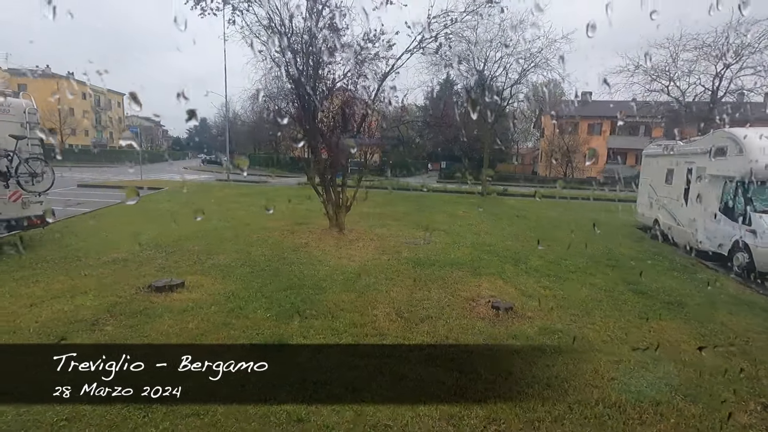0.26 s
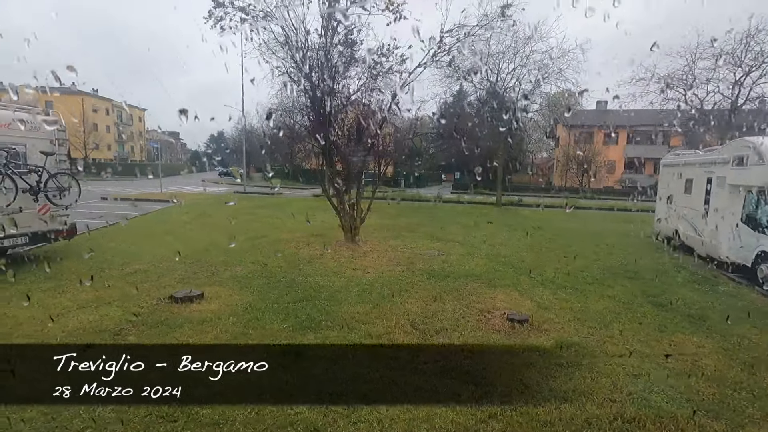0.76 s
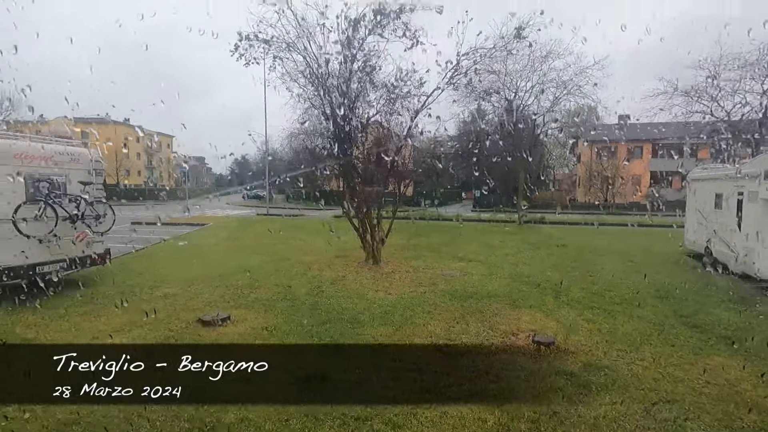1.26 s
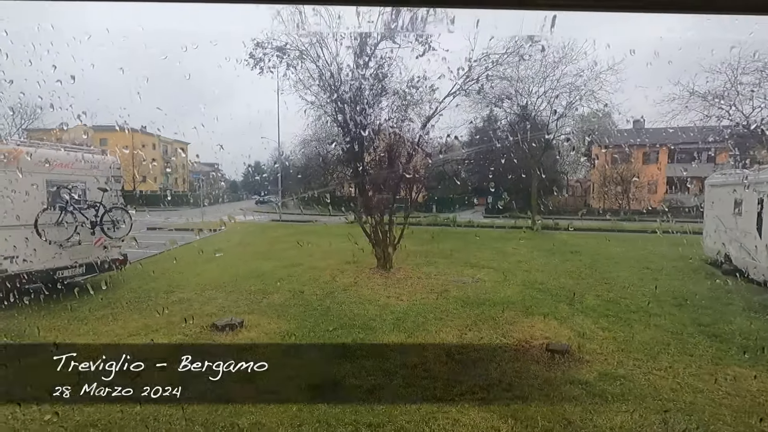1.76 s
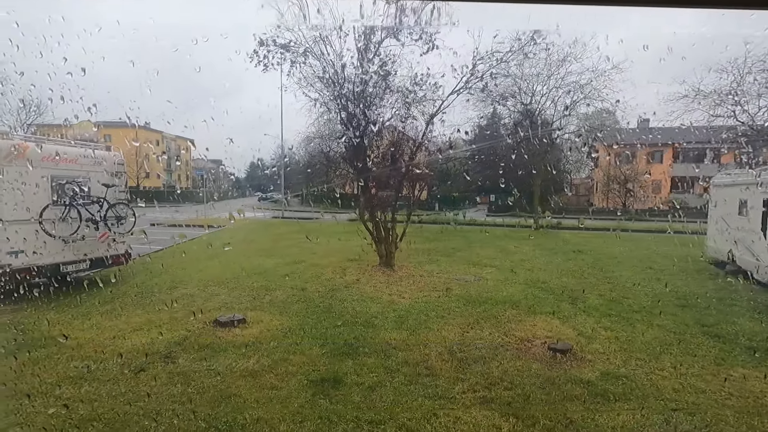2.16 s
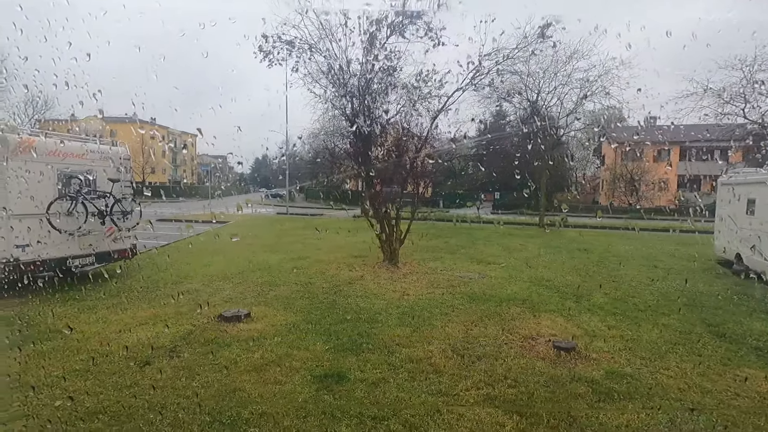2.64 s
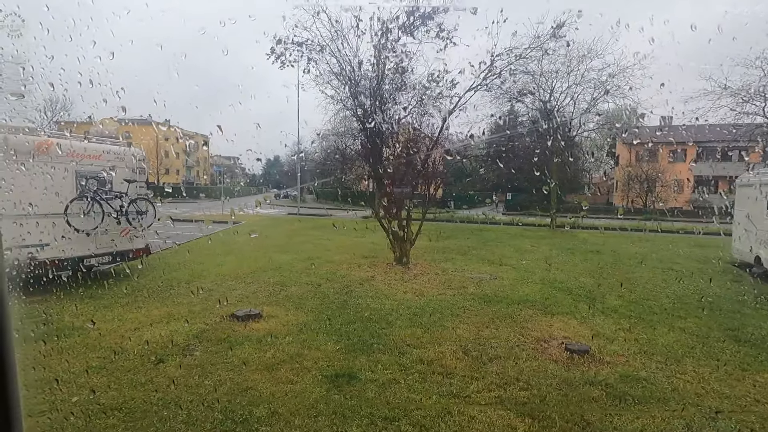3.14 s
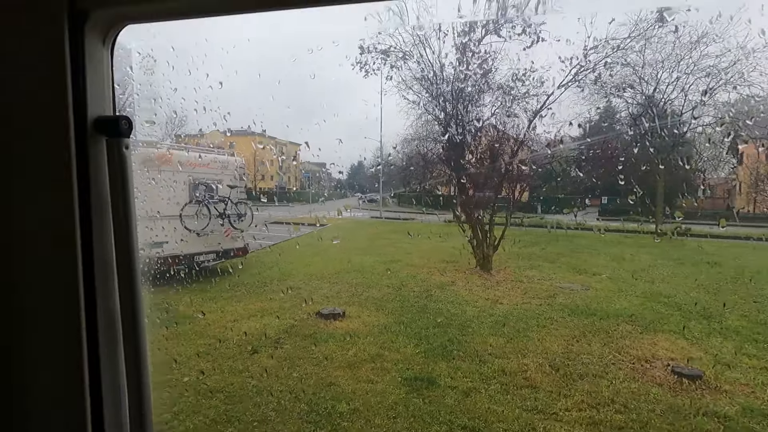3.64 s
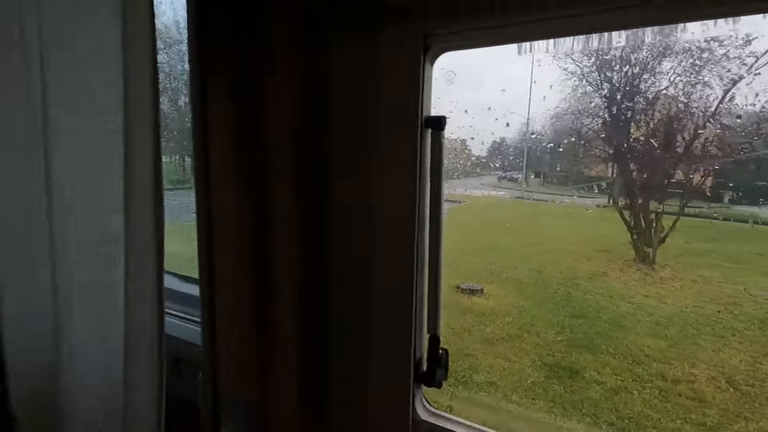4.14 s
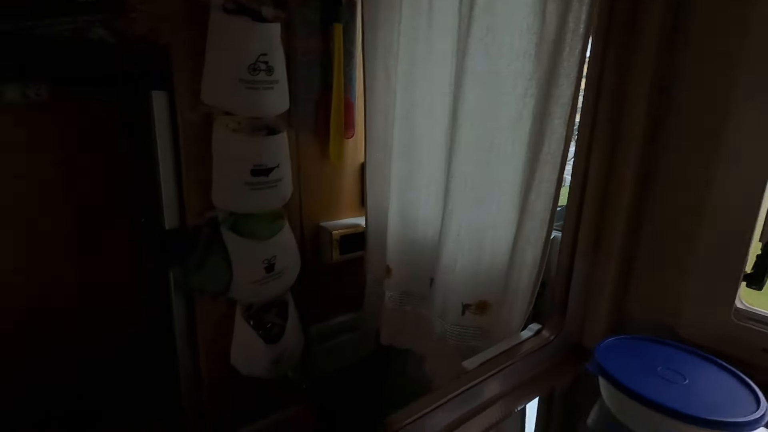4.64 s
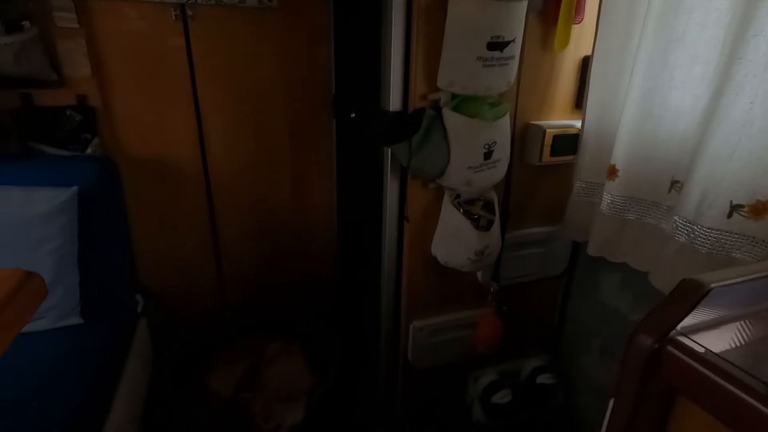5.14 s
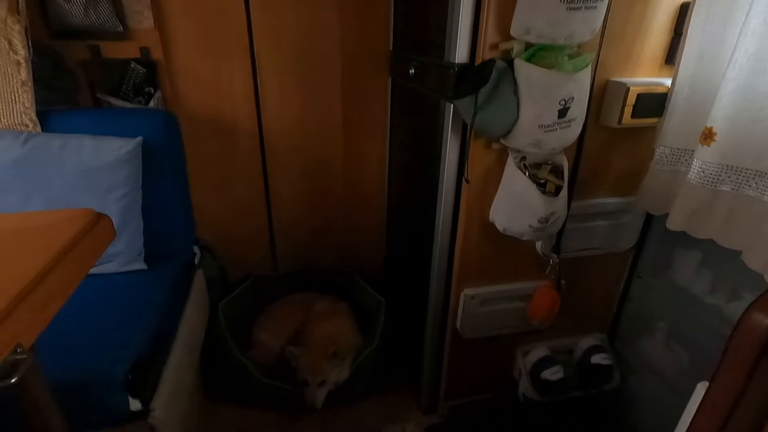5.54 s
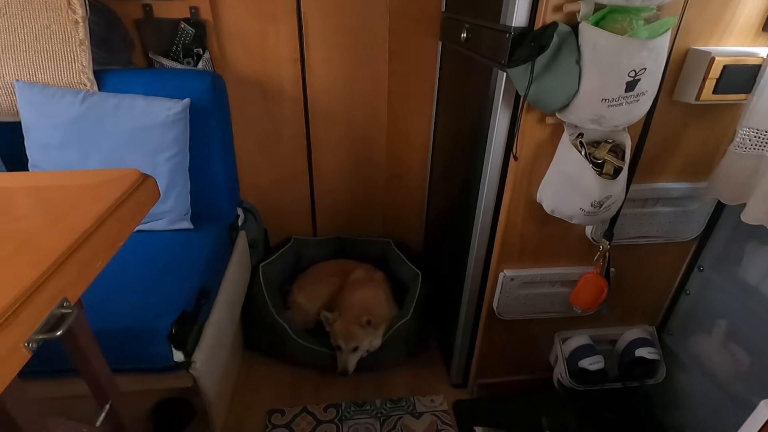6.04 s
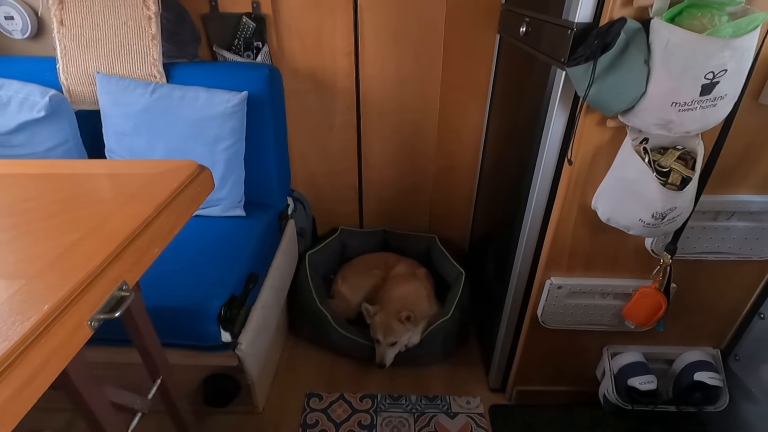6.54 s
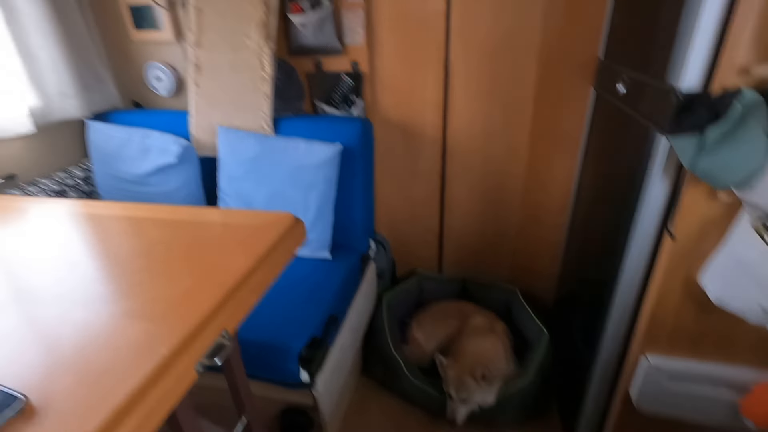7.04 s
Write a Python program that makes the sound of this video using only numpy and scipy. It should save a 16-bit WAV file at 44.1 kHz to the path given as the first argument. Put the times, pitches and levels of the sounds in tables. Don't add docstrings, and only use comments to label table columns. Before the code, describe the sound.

Steady soft rain on a parked van, heard from inside; midway come fabric swishes, a metal clack, thumps, then three growing close knocks.

```python
import sys
import numpy as np
from scipy import signal
from scipy.fft import rfft, irfft
from scipy.io import wavfile
from scipy.ndimage import uniform_filter1d

SR = 44100
rng = np.random.default_rng(int(sys.argv[2]) if len(sys.argv) > 2 else 0)


def field_ratio(decibels):
    return 10 ** (np.asarray(decibels, dtype=float) / 20)


def transcribe(u):
    v = np.clip(np.atleast_2d(u).T, -1, 1)
    q = np.round(v * 32767).astype(np.int16)
    wavfile.write(sys.argv[1], SR, q)


N = 321656
T = np.arange(N) / SR
HZ = np.arange(N // 2 + 1) * SR / N + 1e-3
BURST_T = np.arange(int(.4 * SR)) / SR

# time_s, level_db
RAIN_SWELL = [(0, -0.5), (.47, -1), (.75, -1), (1.4, -1.5), (2.17, 1.5), (2.56, 0), (2.86, 0), (3.3, 0.5),
              (3.88, 2), (4.2, -1.5), (4.81, 4), (5.1, 1), (5.56, 4.5), (5.91, -1.5), (6.29, 6), (6.65, 1),
              (6.9, 1), (7.29, 3.5)]
# time_s, turn
CAMERA_TURN = [(0, 0), (3.9, .1), (4.6, .7), (5.1, 1), (7.29, 1)]
# pitch_hz, width_hz, window_lift_db, cabin_lift_db
ROOF_PANELS = [(198, 14, 2, 4), (385, 20, 5, 3), (440, 16, 4, 2), (578, 24, 4, 0), (1430, 90, 2, 0),
               (3400, 500, 1, 3)]
# pitch_hz, level_db_per_hz
ROOF_WINDOW = [(36, -30.5), (62, -9.5), (70, -7.5), (131, -2), (260, -24), (372, -19.5), (446, -21.5),
               (468, -28), (574, -23.5), (804, -43.5), (1100, -54), (1430, -69), (2420, -120)]
# pitch_hz, level_db_per_hz
ROOF_CABIN = [(41, -34.5), (70, 10.5), (76, -18.5), (108, -22), (150, -8.5), (198, -3), (437, -15),
              (474, -17.5), (538, -16), (806, -35), (1100, -27.5), (1430, -55), (2420, -120)]
# pitch_hz, level_db_per_hz
PATTER_WINDOW = [(440, -36), (750, 6.5), (935, -8.5), (1100, -1.5), (1240, -3), (1420, -1.5), (1750, -7),
                 (2130, -8.5), (3430, -8.5), (4270, -25.5), (7630, -31), (12000, -60), (15600, -59),
                 (22000, -120)]
# pitch_hz, level_db_per_hz
PATTER_CABIN = [(440, -35), (750, -5), (804, -12), (1070, 3.5), (1830, -4), (3230, -12), (3390, -19),
                (7540, -29), (12000, -59), (15600, -59), (22000, -120)]
# window_db, cabin_db, share of the swell followed
RAIN_LAYERS = [
    (-49.5, -54, 1),
    (-62, -56, .7),
    (-69.5, -66.5, 0.83),
    (-86.5, -84, .1),
]
# pitch_hz, side_minus_mid_db
STEREO_WIDTH = [(60, -30.5), (110, -26), (200, -13.5), (380, -17.5), (700, -8), (1290, -8.5), (2380, -7),
                (4400, -8), (8120, -7), (15000, 27)]
# pitch_hz, left_minus_right_db
STEREO_LEAN = [(60, 6), (110, -0.5), (200, 0.0), (380, 2), (700, 0.5), (1290, 2), (2380, 2), (4400, 1.0),
               (8120, 4), (15000, 20.5)]
# start_s, peak_db, low_part_db, ring_s
PANE_DROPS = [(0.0054, -55.5, -8, 0.077), (0.0938, -60, -8, 0.24), (0.2734, -62, -13, 0.16),
              (0.591, -69, -30, 0.097), (0.882, -54.5, -6, 0.28), (0.997, -63, -11, 0.09),
              (1.1883, -67, -4, 0.075), (1.2335, -63, 9, 0.47), (1.284, -64, -7, 0.09),
              (1.499, -53, -29, 0.13), (1.751, -61.5, -11, 0.25), (1.8346, -56.5, 6, 0.12),
              (1.945, -72, -5, 0.09), (2.257, -65, -12, 0.15), (2.9723, -63, 7, 0.23),
              (3.0553, -67, -5, 0.083), (3.441, -77, -9, 0.13)]
# start_s, peak_db, pitch_hz, low_part_db, ring_s
CABIN_TAPS = [(3.1558, -52.5, 2820, -19, 0.13), (3.703, -53, 3500, 4, 0.03),
              (3.7675, -36, 2500, -10, 0.072), (4.3036, -57, 2600, 4, 0.14), (4.933, -59, 2680, 9, 0.11),
              (5.116, -43.5, 2500, -1.5, 0.2), (5.176, -47, 2300, 5, 0.078), (5.227, -48, 3140, 1, 0.13),
              (5.6226, -52.5, 2130, 12, 0.16), (6.311, -58, 2610, 7, 0.11), (6.6872, -63, 2443, 11.5, 0.1),
              (6.86, -51.5, 4140, -18, 0.16)]
# start_s, left_peak_db, right_peak_db
HANDLE_KNOCKS = [
    (5.4244, -27.5, -20),
    (5.80274, -17, -10),
    (6.12444, -15.3, -8.2),
]
KNOCK_TICK_DB = (-40.5, -33, -34)
# thud_hz, bend_hz, thud_lag_s, crack_hz, crack_edge_hz, crack_db
HANDLE_PATHS = [
    (138, 440, .00027, 1130, 1300, -29.5),
    (165, 305, .00007, 255, 900, -15.5),
]
# start_s, peak_db, rattle_s
LATCH_BOUNCES = [
    (4.7685, -40, .004),
    (4.774, -22, .005),
    (4.783, -26.5, .011),
    (4.797, -32.5, .005),
    (4.808, -39, .012),
    (4.826, -46, .012),
]
# pitch_hz, level_db, t60_s
LATCH_MODES = [(340, -12, .05), (640, -2, .045), (735, -2, .04), (900, -3, .02), (1179, 0, .04),
               (1550, 3, .012), (2050, 3, .018), (2400, -3, .015), (2750, -3, .012), (3305, -3, .014),
               (3800, -3, .018), (4300, -8, .012), (4900, -13, .012), (6778, -11, .008)]
# start_s, peak_db, pitch_hz, t60_s
FLOOR_THUMPS = [(3.769, -43.5, 350, 0.081), (3.869, -39.5, 84, 0.23), (3.951, -43.5, 116.5, .3),
                (4.302, -34.5, 99, 0.22), (4.341, -32, 108, 0.07), (5.118, -30, 202, 0.033),
                (5.1787, -23.5, 159.4, 0.093), (5.186, -27, 89.5, 0.06), (5.23, -34.5, 69, 0.15),
                (7.129, -38, 328, 0.049)]
# start_s, peak_db, hold_s, t60_s, pitch_hz
CLOTH_SWISHES = [(3.684, -68.5, 0.025, .02, 6830), (3.698, -61.5, .074, .02, 6500),
                 (3.839, -71, 0.008, 0.052, 8950), (4.297, -58, 0.012, 0.31, 4130),
                 (4.325, -60, 0.022, 0.12, 2080), (4.632, -68, 0.027, 0.19, 4760),
                 (5.117, -54, 0.04, .12, 3850), (5.168, -51, .0047, 0.081, 1960),
                 (5.614, -56.5, 0.019, .06, 4440), (6.853, -58, 0.018, 0.08, 3060),
                 (7.064, -88, .04, .15, 5000), (7.23, -78, .05, .1, 5000)]
# start_s, pitch_hz, width_hz, level_db, hold_s
CLOTH_SQUEAKS = [
    (3.277, 4750, 500, -77, 0.019),
    (3.695, 4900, 160, -61.5, 0.024),
    (3.7, 8900, 30, -69, 0.058),
]
# peak_s, peak_db, swell_s, fade_s
ARM_STROKES = [(.87, -86, 0.42, 0.47), (3.25, -102, .4, .4), (3.62, -91.5, 0.43, 0.64),
               (3.79, -80, 0.23, .1), (3.94, -78, 0.11, 0.19), (4.63, -82.5, 1, 0.33),
               (4.755, -68.5, 0.087, 0.068), (4.95, -80.5, 0.41, 0.5), (5.2, -87, 0.18, 0.18),
               (5.33, -87, .1, 0.36), (5.5, -77, .25, 1), (5.62, -87, 0.44, 0.52), (5.73, -91, .3, .07),
               (5.97, -94, 0.1, 0.064), (6.086, -88, 0.046, 0.021), (6.19, -84.5, .05, 0.17),
               (6.664, -86, .05, 0.072), (6.9, -83.5, 0.13, 0.12), (7.104, -85, .06, .2),
               (7.29, -83, 0.16, .1)]
# pitch_hz, level_db_per_hz
CLOTH_COLOUR = [(880, -32), (1500, -2), (1670, -6), (1910, 0), (2570, -8), (2750, -8), (7210, -18),
                (12200, -29), (15400, -47)]
# peak_s, peak_db
HAND_LURCHES = [(.13, -68), (.6, -61), (2.54, -54), (3.42, -44.5), (3.96, -54), (4.5, -43), (5.62, -39),
                (5.97, -42), (6.498, -55), (6.998, -47)]
# time_s, low_hum_db, high_hum_db
HUM_LEVELS = [(0, -47, -46), (.7, -44, -56.5), (1.3, -46, -44.5), (2, -46.5, -48), (2.8, -44.5, -45.5),
              (3.3, -52.5, -47.5), (3.8, -48.5, -48), (4.2, -40, -41), (4.8, -49, -42), (5.3, -39, -43),
              (5.7, -44.5, -44.5), (6.3, -44.5, -43.5), (6.8, -43, -46), (7.29, -43.5, -44.5)]
HUM_PITCHES = (33.9, 49.1)


def unit(x):
    return x / np.sqrt(np.mean(x ** 2, axis=-1, keepdims=True))


def curve(table):
    s, *columns = np.transpose(table)
    return [np.interp(T, s, c) for c in columns]


def colour(points):
    hz, db = np.transpose(points)
    return np.interp(np.log(HZ), np.log(hz), db)


def band(x, hz, width, order=1):
    edges = np.clip([hz - width / 2, hz + width / 2], 10, .45 * SR)
    return signal.sosfilt(signal.butter(order, edges, "band", fs=SR, output="sos"), x)


def walk(rate):
    k = int(SR / rate)
    steps = np.repeat(rng.standard_normal(N // k + 1), k)
    return 2.75 * uniform_filter1d(steps, k)[:N]


def add(out, s, x):
    i = int(s * SR)
    out[:, i:i + x.shape[-1]] += x[..., :N - i]


def wide(length, side_db, lean_db):
    mid, side = rng.standard_normal((2, length))
    side = field_ratio(side_db) * side
    return np.array([(mid + side) * field_ratio(lean_db / 2), (mid - side) * field_ratio(-lean_db / 2)])


def envelope(rise, hold, t60):
    fall = field_ratio(-60 * np.clip(BURST_T - rise - hold, 0, None) / t60)
    return np.clip(BURST_T / max(rise, 1e-4), 0, 1) ** 2 * fall


def swells(rows, rest_db):
    power = field_ratio(2 * rest_db)
    for s, db, swell, fade in rows:
        distance = np.where(T < s, (s - T) / swell, (T - s) / fade)
        power = power + field_ratio(2 * db - 40 * distance)
    return np.sqrt(power)


def patter(rate=700, scatter_db=2.5, t60=0.12):
    hits = (rng.random(N) < rate / SR) * field_ratio(2 * scatter_db * rng.exponential(size=N))
    tail = field_ratio(-60 * np.arange(SR // 4) / SR / t60) ** 2
    floor = 0.13 * hits.mean() * tail.sum()
    return np.sqrt(signal.fftconvolve(hits, tail)[:N].clip(0) + floor)


def rain():
    (turn,), (swell_db,) = curve(CAMERA_TURN), curve(RAIN_SWELL)
    mid, side = rfft(rng.standard_normal((2, N)) * patter())
    side = side * field_ratio(colour(STEREO_WIDTH))
    pair = np.array([mid + side, mid - side]) * field_ratio(np.outer([.5, -.5], colour(STEREO_LEAN)))
    lifts = [0, 0]
    for hz, width, *lift_db in ROOF_PANELS:
        peak = 1 / (1 + (2 * (HZ - hz) / width) ** 2)
        lifts = [lift + db * peak for lift, db in zip(lifts, lift_db)]
    roof = [field_ratio(colour(p) + lift) for p, lift in zip((ROOF_WINDOW, ROOF_CABIN), lifts)]
    drops = [field_ratio(colour(p) + lift) for p, lift in zip((PATTER_WINDOW, PATTER_CABIN), lifts)]
    edges = (64, 220, 900, 4200, 14000)
    out = 0
    for layer, lo, hi, gains in zip(RAIN_LAYERS, edges, edges[1:], (roof, roof, drops, drops)):
        window_db, cabin_db, share = layer
        group = [0, 0]
        for hz in lo * 2 ** np.arange(1 / 6, np.log2(hi / lo), 1 / 3):
            mask = np.cos(np.pi / 2 * np.clip(3 * np.log2(HZ / hz), -1, 1))
            flicker = field_ratio(.7 * walk(14))
            group = [g + flicker * irfft(pair * mask * gain, N) for g, gain in zip(group, gains)]
        near, far = (g / g.std() for g in group)
        places = (1 - turn) * field_ratio(window_db) * near + turn * field_ratio(cabin_db) * far
        out = out + field_ratio(share * swell_db) * places
    return out


def tap(out, s, db, hz, low_db, t60, core_db, high_db):
    noise = wide(len(BURST_T), -7, 1.5)
    ring = field_ratio(core_db) * unit(band(noise, hz, 600, order=2))
    ring = ring + unit(band(noise, 2700, 2400, order=2))
    ring = ring + field_ratio(low_db) * unit(band(noise, 1400, 1000, order=2))
    ring = ring + field_ratio(high_db) * unit(band(noise, 5200, 2400, order=2))
    onset = envelope(.003, .004, t60)
    add(out, max(s - .003, 0), field_ratio(db - 10) * onset * band(ring, 3500, 5600, order=3))


def heavy_drops(out):
    for s, db, low_db, t60 in PANE_DROPS:
        tap(out, s, db, 3260, low_db, t60, core_db=-1, high_db=-19)
    return out


def cabin_taps(out):
    for row in CABIN_TAPS:
        tap(out, *row, core_db=-9.5, high_db=-20)
    return out


def knocks(out):
    crack_damping, low_cut_hz = .65, 25
    jw = 1j * np.fft.rfftfreq(8192, 1 / SR)
    low_cut = jw ** 2 / (jw ** 2 + 2 ** .5 * low_cut_hz * jw + low_cut_hz ** 2)
    for ear, (thud_hz, bend_hz, lag, crack_hz, edge_hz, crack_db) in enumerate(HANDLE_PATHS):
        bend = ((jw - bend_hz) / (jw + bend_hz)) ** 2 * np.exp(-2 * np.pi * jw * lag)
        thud = bend * low_cut / (1 + jw / thud_hz) ** 2
        u = jw / crack_hz
        crack = field_ratio(crack_db) * u / (1 + crack_damping * u + u ** 2) / (1 + jw / edge_hz)
        blow = -irfft((thud + crack) / (1 + jw / 9000) ** 2)[None]
        for s, *peak_db in HANDLE_KNOCKS:
            add(out[ear:ear + 1], s, field_ratio(peak_db[ear]) * blow / abs(blow).max())
    tick = -band(signal.unit_impulse(256), 6800, 4600, order=2)
    for (s, *_), db in zip(HANDLE_KNOCKS, KNOCK_TICK_DB):
        add(out, s, field_ratio(db) * tick[None] / abs(tick).max())
    return out


def latch(out):
    body = sum(field_ratio(g - 60 * BURST_T / t60) * np.sin(2 * np.pi * hz * BURST_T) for hz, g, t60 in LATCH_MODES)
    for s, db, rattle in LATCH_BOUNCES:
        shake = wide(len(BURST_T), -8, 2) * envelope(.0015, rattle, .03)
        ring = signal.fftconvolve(shake, body[None], axes=1)[:, :len(BURST_T)]
        ring = band(ring, 3900, 7300, order=2)
        grit = band(shake, 1970, 2920, order=2)
        add(out, s, field_ratio(db) * (ring / abs(ring).max() + field_ratio(-11) * grit / abs(grit).max()))
    return out


def floor_thumps(out):
    for s, db, hz, t60 in FLOOR_THUMPS:
        tone = np.sin(2 * np.pi * hz * BURST_T) * np.ones((2, 1))
        add(out, s, field_ratio(db) * envelope(.002, 0, t60) * tone)
    return out


def cloth_swishes(out):
    for s, db, hold, t60, hz in CLOTH_SWISHES:
        noise = band(wide(len(BURST_T), -7, 1.5), 7000, 13000)
        air = field_ratio(-17.5) * unit(band(noise, 8200, 7700, order=2))
        rub = unit(band(noise, hz, 1.13 * hz, order=2))
        add(out, s, field_ratio(db) * envelope(.004, hold, t60) * (rub + air))
    for s, hz, width, db, hold in CLOTH_SQUEAKS:
        whistle = unit(band(wide(len(BURST_T), -10, 1), hz, width, order=2))
        add(out, s, field_ratio(db) * envelope(.01, hold, .02) * whistle)
    return out


def rustle():
    grain = wide(N, -4.5, 1.0) * patter(rate=1700, scatter_db=2.5, t60=0.13)
    cloth = rfft(grain) * field_ratio(colour(CLOTH_COLOUR)) * (HZ > 700)
    treble = irfft(cloth * (HZ > 7500) * (HZ < 12000), N)
    return swells(ARM_STROKES, -112) * irfft(cloth, N) / treble.std()


def sway():
    push, rumble = rng.standard_normal((2, N))
    lurch_s = 0.23
    lurches = swells([(*row, lurch_s, lurch_s) for row in HAND_LURCHES], -64.5)
    street = field_ratio(-50.5) * unit(band(rumble, 45.2, 34, order=2))
    return lurches * unit(band(push, 27.0, 42.0, order=2)) + street


def hums():
    out = 0
    for hz, db in zip(HUM_PITCHES, curve(HUM_LEVELS)):
        wander = walk(2)
        phase = 2 * np.pi * hz * T + .45 * (wander - wander[0]) - 1.5
        out = out + 2 ** .5 * field_ratio(db + 0.46 * walk(4.1)) * np.sin(phase)
    return out


def scene():
    out = rain() + rustle() + hums() + sway()
    out = cabin_taps(heavy_drops(out))
    out = floor_thumps(latch(cloth_swishes(out)))
    return knocks(out)


def low_pass(x):
    return signal.sosfilt(signal.butter(12, 15590, fs=SR, output="sos"), x)


def record(dry):
    close = np.clip((T[-1] - T) / .004, 0, 1)
    return low_pass(dry * close)


dry = scene()
out = record(dry)
transcribe(out)
```